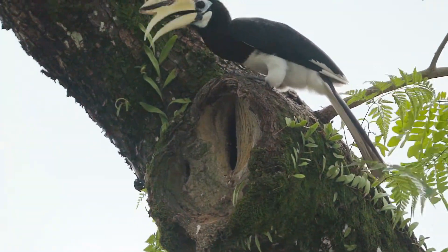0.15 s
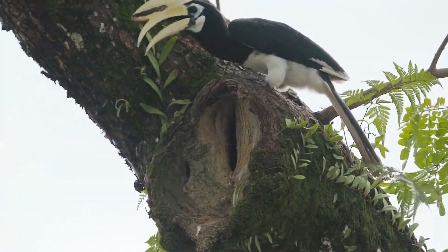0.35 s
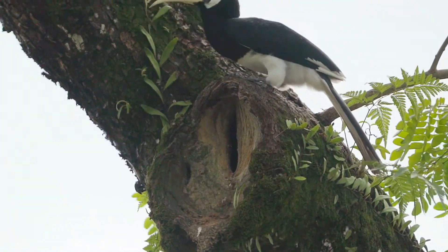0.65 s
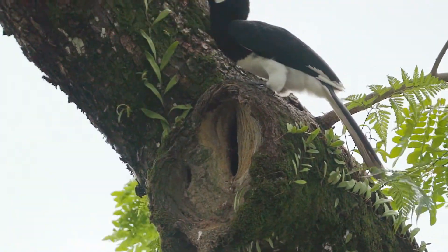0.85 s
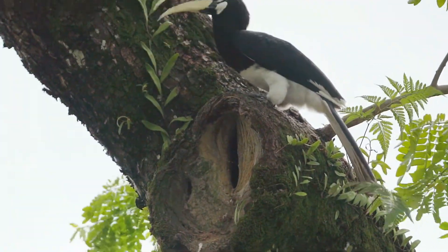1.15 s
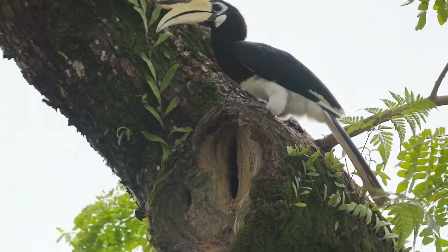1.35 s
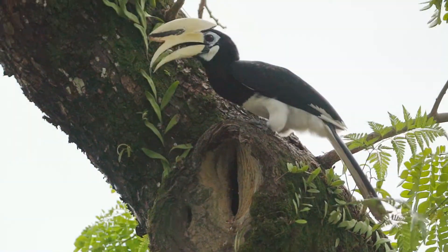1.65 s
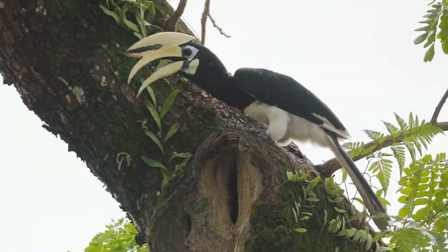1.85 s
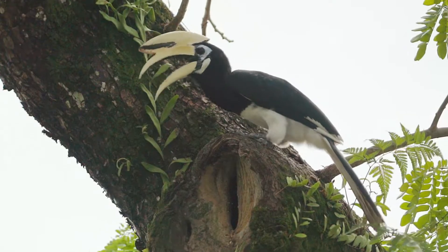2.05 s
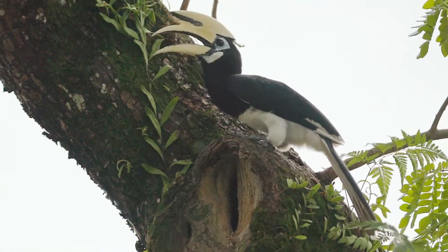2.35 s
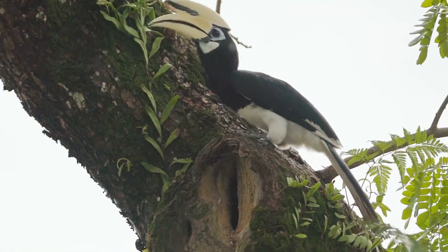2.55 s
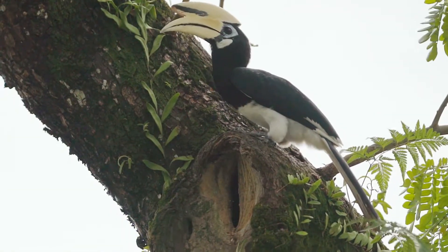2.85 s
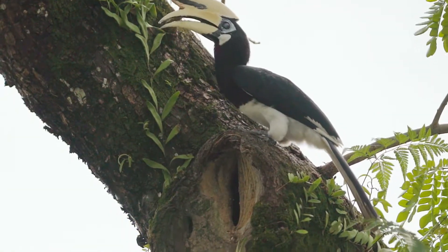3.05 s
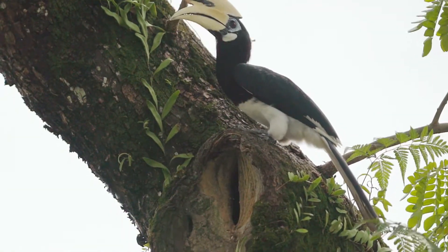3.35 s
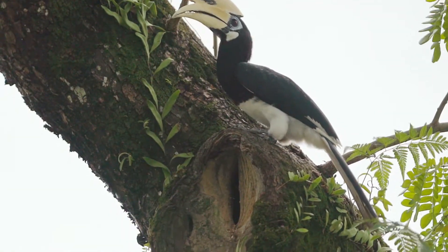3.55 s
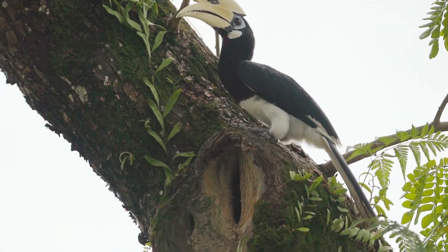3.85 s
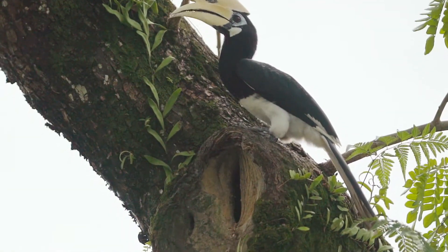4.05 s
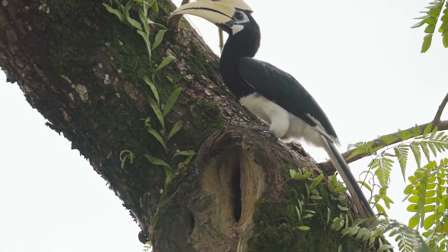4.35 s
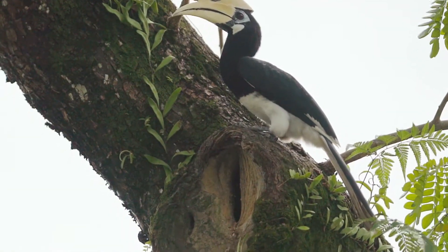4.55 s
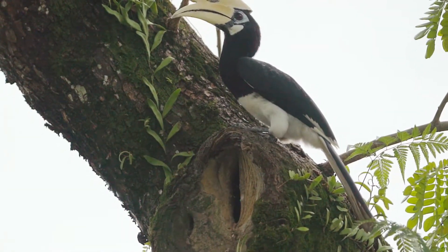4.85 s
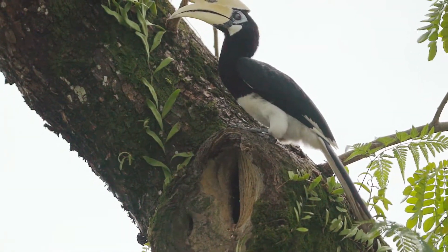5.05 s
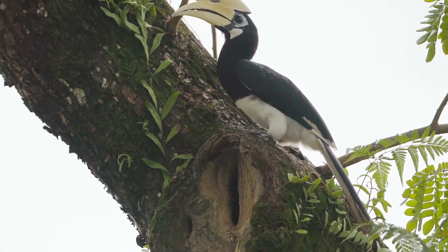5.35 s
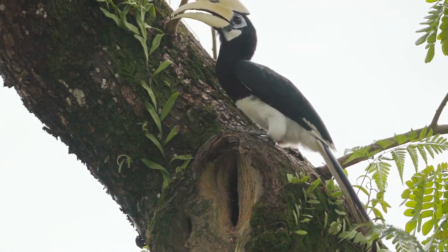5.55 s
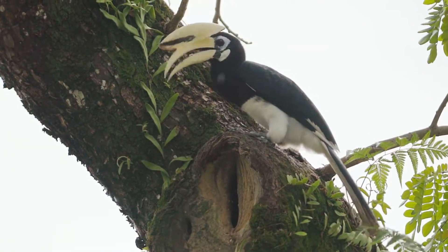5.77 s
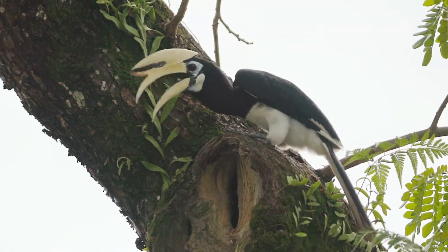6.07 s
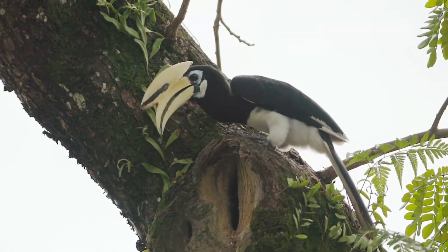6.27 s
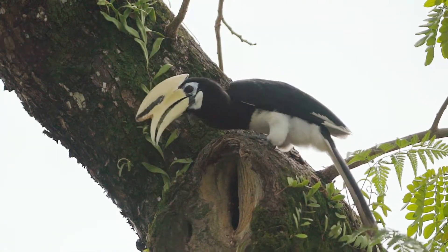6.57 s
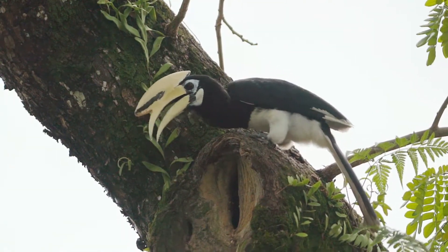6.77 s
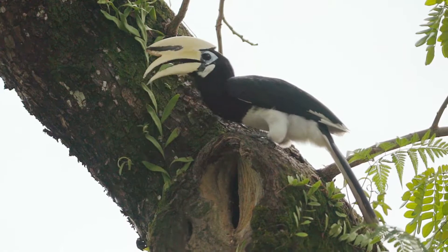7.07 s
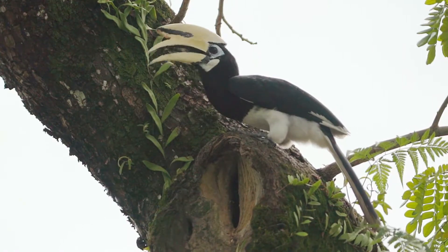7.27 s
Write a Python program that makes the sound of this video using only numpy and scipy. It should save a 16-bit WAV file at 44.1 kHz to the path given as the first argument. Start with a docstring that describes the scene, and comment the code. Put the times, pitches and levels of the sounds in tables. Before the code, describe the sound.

A hornbill calls close to the microphone in a quiet forest, with soft air, leafy hiss and thin, high insect drones. At 0.14 s comes a strong, nasal yelp that holds its pitch, then breaks downward, followed by a patter of dry bill ticks. Softer, shorter yelps follow at 0.6, an overlapping pair near 0.95, then 1.3 and 1.7, with very faint low hoots far off. Louder, brighter calls ring at 2.35 and 2.8, a sharp tick just before the second, each trailing a brief woodland echo. From 3.3 to 4.9 the opening yelps and ticks repeat exactly. Near 5.0 everything drops to a low hush, then insects and faint far birds swell back by 5.6. At 6.0 a tiny high squeak opens the loudest yelp. Soft ticks and a faint knock come at 6.5; at 6.8 all stops but the hush.

```python
"""Hornbill calling in a spliced forest scene

A hornbill on a tree trunk gives five falling yelps and two loud calls; an edit replays the opening stretch of
yelps, ticks and hoots 3.14 s later, and a last loud yelp opens with a squeak. Each yelp is a sum of harmonics
and half harmonics through a throat; the voice cracks to the octave below as notes fall. Echoes and a noise
tail are the forest throwing them back. Bands of noise make insects, far birds and ticks; gliding sines make
far hoots. All but a low hush of noise drops out near 5 s, swells back, and stops at 6.8 s."""
import sys
import numpy as np
from scipy import signal
from scipy.fft import rfft, irfft, next_fast_len
from scipy.io import wavfile

SR = 44100
rng = np.random.default_rng(int(sys.argv[2]) if len(sys.argv) > 2 else 0)


def wrap_up_sound(samples):
    """Save the sound to the file named by the first command line argument, as 16-bit audio."""
    columns = np.atleast_2d(samples).T
    # keep every value between -1 and 1, then stretch to whole-number steps
    tamed = np.clip(columns, -1, 1)
    steps = np.round(tamed * 32767).astype(np.int16)
    wavfile.write(sys.argv[1], SR, steps)


N = 326903
TIME = np.arange(N) / SR
STRETCH_END_S, REPLAY_AFTER_S = 1.85, 3.1368  # end of the opening stretch, and the delay until its replay


def amp(db):
    """Decibels to gain."""
    return 10 ** (np.asarray(db) / 20)


def unit(x):
    """Scales to rms 1."""
    return x / np.sqrt(np.mean(x ** 2) + 1e-20)


def read(points, hz, axis=1):
    """Reads one column of a spectrum table on a log-frequency axis."""
    table = np.transpose(points)
    return np.interp(np.log(hz + 1), np.log(table[0] + 1), table[axis])


def add(mix, s, sound):
    """Mixes a sound in at s seconds, cut at the end of the mix."""
    part = mix[..., round(s * SR):][..., :sound.shape[-1]]
    part += sound[..., :part.shape[-1]]


def drift(size, rate_hz):
    """Slow chance of rms 1, with nothing much faster than rate_hz."""
    hz = np.fft.rfftfreq(size, 1 / SR)
    return unit(irfft(rfft(rng.standard_normal(size)) / (1 + (hz / rate_hz) ** 4), size))


def peak(hz, centre, width):
    """Gain of a resonance, down to half at width either side of the centre."""
    return 1 / (1 + ((hz - centre) / width) ** 2)


def step(t, width_s):
    """A smooth step from 0 to 1 around t = 0."""
    return .5 + .5 * np.tanh(2 * t / width_s)


def noise(shape, size=N):
    """Stereo noise of rms 1 with the spectrum shape(hz); the ears agree in the bass."""
    # left-right likeness: (frequency [Hz], correlation [0-1])
    likeness = [(400, 0.94), (1000, 0.49), (1800, 0.33), (7000, 0.12), (13000, 0.12)]
    hz = np.fft.rfftfreq(size, 1 / SR)
    left, other = rfft(rng.standard_normal((2, size)))
    same = np.clip(read(likeness, hz), -1, 1)
    right = same * left + np.sqrt(1 - same ** 2) * other
    return unit(irfft(np.array([left, right]) * shape(hz), size))


def starts(s):
    """The opening stretch of calls, ticks and hoots is replayed by an edit 3.14 s later."""
    return [s, s + REPLAY_AFTER_S] if s < STRETCH_END_S else [s]


def hornbill():
    """Every call of the bird at its moment; the third of the five opening yelps is two overlapping calls."""
    # yelps: (start [s], hold until the voice breaks [s], fall [s], release [s], scoop [s], cracked for [s],
    # held pitch [Hz], top level [dB], top effort [0-1], upper throat ring [Hz], ring gain [dB],
    # treble sheen gain [dB])
    yelps = [(0.142, 0.083, 0.044, 0.03, .002, 0.00027, 970.5, -19, 0.84, 3770, -1.5, 7.5),
             (.572, .045, 0.0081, 0.061, 0.0049, .013, 968, -28, 0.15, 3750, -6.5, -6),
             (.939, .035, 0.014, 0.06, 0.0057, 0.011, 969, -26.5, 0.21, 3520, -3.5, -3.5),
             (.99, .038, .06, .036, .002, .048, 921, -32.5, 0.08, 3800, 5, -2.5),
             (1.278, .044, 0.0097, 0.047, 0.0047, 0.007, 979.6, -28, 0.39, 3100, 0.5, -2),
             (1.729, 0.035, .014, 0.011, .004, 0.0013, 928, -33, 0.71, 3260, -18.5, -5),
             (2.349, 0.074, 0.0075, 0.0053, 0.0018, 0.031, 961, -20, .68, 3907, 13.5, -2.5),
             (2.803, .1, .055, .042, 0.0019, 0, 982.3, -15.5, 0.96, 3794, 8.5, -3),
             (6.006, 0.02, .02, .008, 0.0017, 0.015, 1440, -35, 1, 3380, 4.5, -11.5),
             (6.017, .049, 0.016, .042, .008, 0, 1001, -14.5, 1, 3430, 15, -12)]
    voice = np.zeros(N)
    for start, *shape, ring_hz, ring_db, sheen_db in yelps:
        for s in starts(start):
            add(voice, s, yelp(gesture(*shape), ring_hz, ring_db, sheen_db))
    return voice


def gesture(hold_s, fall_s, release_s, scoop_s, cracked_s, held_hz, top_db, top_effort):
    """The course of a yelp: pitch, level, effort, slackness of the membranes and half-harmonic level."""
    scoop, arch, drop = .16, .025, .115  # shares of the held pitch
    full_fall_s = .036  # the release needed to fall all the way
    onset_db, soft_attack_s, hard_attack_s = -24, 0.0085, .004
    release_db, effort_per_db = -20, 0.05
    held_halves_db, slack_halves_db, cracked_halves_db = -41.5, -29, 4
    crack_rise_s, crack_end_s, crack_lag_s = 0.016, .007, 0.0038

    t = np.arange(0, hold_s + release_s, 1 / SR)
    since_break = t - hold_s

    # it scoops down onto its note, arches a little, then breaks and falls
    slack = step(since_break, fall_s) * min(release_s / full_fall_s, 1)  # cut short, it falls only part way
    arching = np.sin(np.pi * np.minimum(t / hold_s, 1)) - 1
    pitch = held_hz * (1 + scoop * np.exp(-t / scoop_s) + arch * arching - drop * slack)

    # it swells from below, faster at full effort, and dies away after the break; effort follows the level
    attack_s = np.interp(top_effort, [0, 1], [soft_attack_s, hard_attack_s])
    swell_db = onset_db * np.exp(-t / attack_s) + release_db * np.maximum(since_break, 0) / release_s
    effort = np.clip(top_effort + effort_per_db * swell_db, 0, 1)

    # the crack comes and goes over a few beats, and ends just after the break
    crack_depth = np.clip(cracked_s / crack_end_s, 0, 1)
    crack_in = step(since_break - crack_lag_s + cracked_s, crack_rise_s)
    crack_out = step(crack_lag_s - since_break, crack_end_s)
    cracked = crack_depth * crack_in * crack_out
    halves = amp(held_halves_db) + amp(slack_halves_db) * slack + amp(cracked_halves_db) * cracked
    return pitch, top_db + swell_db, effort, slack, 20 * np.log10(halves)


def yelp(course, ring_hz, ring_db, sheen_db, jitter=0.0015, slack_jitter=0.0079, strain_jitter=.014,
         thinning_db=-7, dulling_db=-5, dull_above_hz=4300,
         ring_width_hz=650, sheen_hz=5500, sheen_width_hz=1100,
         rasp_db=-35, slack_rasp_db=14, strain_rasp_db=4, cracked_rasp_db=7, shimmer_db=1.62):
    """One call: the syrinx's harmonics and half harmonics through a throat whose colour shifts with effort."""
    # throat and bill: (frequency [Hz], gain in a soft call [dB], gain at full effort [dB])
    throat = [(414.6, -10.5, -26), (965, 3.5, -13), (1310, -0.5, 7.5), (1902, -3.5, 3.5), (2120, -18.5, -7),
              (2930, -14, -6), (3290, -15, -14), (4060, -33.5, -24), (4570, -23, -28), (6300, -37.5, -16.5),
              (6760, -24.5, -32.5), (9300, -33.5, -43.5), (10200, -43.5, -53.5), (14850, -66, -65.5)]
    pitch, level_db, effort, slack, doubling_db = course
    size = len(pitch)
    strain = slack * effort  # slack membranes beat unevenly, most of all when driven hard
    wobble = jitter + slack_jitter * slack + strain_jitter * strain  # rms share of the pitch
    pitch = pitch * (1 + wobble * drift(size, 250))
    phase = 2 * np.pi * np.cumsum(pitch) / SR
    halves = np.arange(1, 33)[:, None]  # multiples of half the pitch
    hz = halves * pitch / 2

    def gape_db(f):
        """Two upper resonances, set by how far the bill is open."""
        ring = ring_db * np.exp(-((f - ring_hz) / ring_width_hz) ** 2)
        return ring + sheen_db * np.exp(-((f - sheen_hz) / sheen_width_hz) ** 2)

    throat_db = (1 - effort) * read(throat, hz) + effort * read(throat, hz, axis=2) + gape_db(hz)
    # high harmonics flutter most
    throat_db += shimmer_db * np.sqrt(halves / 2) * np.array([drift(size, 50) for _ in halves])
    # a strained fall thins at its fundamental and dulls at its top
    throat_db += thinning_db * strain * (halves <= 2) + dulling_db * strain * (hz > dull_above_hz)
    # strong and weak beats alternate when the voice cracks: lines between the harmonics
    gains = amp(throat_db + halves % 2 * doubling_db)
    waves = np.cos(halves * phase / 2 + rng.uniform(0, 2 * np.pi, halves.shape))
    tone = np.sqrt(2) * (gains * waves).sum(0) / np.linalg.norm(gains, axis=0)

    breath = noise(lambda f: amp(read(throat, f) + gape_db(f)) * (f / (f + 2500)) ** 2, size=size)[0]
    rasp = breath * (1 + np.cos(phase))  # a puff each beat
    hoarse_db = rasp_db + slack_rasp_db * slack + strain_rasp_db * strain
    hoarse_db = hoarse_db + cracked_rasp_db * np.minimum(amp(doubling_db), 1)
    return amp(level_db) * (tone + amp(hoarse_db) * rasp) * signal.windows.tukey(size, .05)


def short_bursts(decay_s=.0018, rise_s=0.00029, spread=1.14, trim_db=-3,
                 faint_db=-43, faint_hz=5500, count=40):
    """Dry, heavily damped noise bursts: bill and bark ticks, two soft rustles, and fainter ones at random."""
    # short noise bursts: bill and bark ticks, with two soft rustles near 1.8 and 2.0 s:
    # (time [s], level before the trim and envelope [dB], centre [Hz])
    bursts = [(.239, -25, 4260), (0.2806, -23, 4870), (.3117, -27.5, 4860), (.333, -29.5, 4500),
              (.362, -31, 4000), (.8699, -28.5, 5660), (1.042, -30.5, 3570), (1.807, -30, 2400),
              (2.002, -26, 2600), (2.717, -15, 4610), (5.37, -30.5, 2790), (5.634, -31, 4300),
              (6.508, -33, 1800), (6.529, -30.5, 2993)]
    out, t = np.zeros((2, N)), np.arange(2048) / SR
    envelope = np.exp(-t / decay_s) * (1 - np.exp(-t / rise_s))
    placed = [(start, db, hz) for s, db, hz in bursts for start in starts(s)]
    faint = [(s, faint_db, faint_hz) for s in rng.uniform(0, N / SR, count)]
    for s, db, hz in placed + faint:
        burst = noise(lambda f: peak(f, hz, spread * hz) ** 2 * f / (f + 800), size=len(t))
        add(out, s, amp(db + trim_db) * burst * envelope)
    return out


def thump(s=6.53, hz=172, db=-38, decay_s=0.007):
    """A soft low knock on the trunk: a damped sine."""
    out, t = np.zeros(N), np.arange(8192) / SR
    envelope = t / decay_s * np.exp(1 - t / decay_s)
    add(out, s, amp(db) * envelope * np.sin(2 * np.pi * hz * t))
    return out


def limb_echoes(voice, limb_hz=1100):
    """Single echoes from near limbs, which throw back the treble only."""
    # trunk, limbs and ground: (delay to the left ear [s], delay to the right ear [s],
    # level before the high-pass [dB])
    echoes = [(.0013, 0.003, -21), (.0052, 0.019, -23.5), (0.0242, 0.017, -7), (0.0371, 0.068, -17.5)]
    t = np.arange(SR) / SR
    taps = np.zeros((2, SR))
    for *delays, db in echoes:
        taps += amp(db) * np.sinc(SR * (t - np.array(delays)[:, None]))
    taps = signal.sosfilt(signal.butter(1, limb_hz, "highpass", fs=SR, output="sos"), taps)
    return signal.fftconvolve(voice[None], taps, axes=1)[:, :N]


def leaf_scatter(voice, wet_db=-18, build_s=0.013, sway=1.2, sway_hz=35):
    """The scatter of leaves and trunks: a noise tail that dies at its own rate in each band."""
    # foliage: (frequency [Hz], time to fall 60 dB [s], relative level [dB])
    foliage = [(400, 0.28, 0), (1000, .45, 0), (1820, 0.77, 1.5), (3040, 0.51, 4), (5740, 0.66, 2),
               (12000, 0.32, -15.5)]
    t = np.arange(SR) / SR
    hz, age, z = signal.stft(noise(np.ones_like, size=SR), SR, nperseg=256)
    z = z * amp(read(foliage, hz, axis=2)[:, None] - 60 * age / read(foliage, hz)[:, None])
    tail = signal.istft(z, SR, nperseg=256)[1][:, :SR] * (1 - np.exp(-t / build_s))
    far = signal.fftconvolve(voice[None], tail / np.linalg.norm(tail[0]), axes=1)[:, :N]
    # shifting paths smear each harmonic: phase drifts by sway [radians rms]
    blur = np.exp(1j * sway * np.array([drift(N, sway_hz) for _ in far]))
    return amp(wet_db) * (signal.hilbert(far, next_fast_len(N))[:, :N] * blur).real


def far_hoots(arch=.11):
    """Soft far hoots: sines whose pitch and level arch together."""
    # far hoots: (start [s], length [s], top pitch [Hz], level [dB])
    hoots = [(0.028, 0.26, 288, -54.5), (0.444, 0.25, 292, -57), (0.816, 0.33, 294, -52.5),
             (2.585, 0.2, 513, -44)]
    out = np.zeros((2, N))
    for s, length, hz, db in hoots:
        swell = np.sin(np.linspace(0, np.pi, round(length * SR)))
        for start in starts(s):
            pitch = hz * (1 + arch * (swell - 1) + 0.0087 * drift(len(swell), 30))
            hoot = np.sqrt(2) * swell * np.sin(2 * np.pi * np.cumsum(pitch) / SR)
            add(out, start, amp(db) * hoot)
    return out


def narrow_bands():
    """Narrow bands of noise that fade in and out: far birds, insect swells and the fading echo of a call."""
    # far birds, insect swells and a call's echo: (start [s], length [s], centre [Hz], width [Hz], level [dB])
    bands = [(1.863, 0.13, 2002, 60, -48.5), (2.16, .16, 1720, 250, -47), (2.561, 0.1, 3700, 900, -47.5),
             (5.147, 0.29, 2820, 40, -55), (5.364, 0.37, 3514, 60, -55.5), (5.419, 0.33, 2780, 450, -54),
             (5.519, 0.52, 4700, 100, -60), (5.663, .14, 4220, 400, -47.5), (5.703, .1, 5420, 250, -52.5),
             (5.718, .26, 5270, 90, -60.5), (5.654, 0.31, 2503, 120, -55), (5.708, 0.22, 1733, 342, -43),
             (6.454, 0.17, 1790, 354, -47), (6.414, 0.39, 4755, 89.5, -56), (6.55, 0.34, 2032, 30, -53)]
    out = np.zeros((2, N))
    for s, length, hz, width, db in bands:
        size = round(length * SR)
        band = noise(lambda f: peak(f, hz, width / 2), size=size)
        add(out, s, amp(db) * band * signal.windows.tukey(size, .6))
    return out


def chorus(hz, width_hz, db):
    """Many insects on one pitch: a narrow band that wavers."""
    waver_db = .8 * drift(N, 5)
    return noise(lambda f: peak(f, hz, width_hz) ** 2) * amp(db + waver_db)


def insects(swell_s=0.78, cut_s=0.034, low_db=-64.5, high_db=-55.5):
    """Three drones; the highest swells, and is cut short where the sound is spliced."""
    # swells of the highest drone, each up to a splice: (start [s], end [s])
    swells = [(.2, 2.1), (3.35, 5.6), (6.15, 6.85)]
    swell = sum(np.clip(np.minimum((TIME - start) / swell_s, (end - TIME) / cut_s), 0, 1)
                for start, end in swells)
    drones = chorus(hz=1692, width_hz=300, db=-51.0) + chorus(hz=6878, width_hz=390, db=-51.0)
    return drones + chorus(hz=7630, width_hz=580, db=low_db + (high_db - low_db) * swell)


def air_and_rustle(air_db=-53, rustle_above_hz=1200, jump_s=.03, fade_s=1.0, base_db=0.7):
    """Steady low air, and above it rustling noise that jumps up where the sound is spliced, then fades."""
    # forest air: (frequency [Hz], relative level per Hz [dB])
    air_colour = [(25, -17.5), (60, -7.5), (130, -3.5), (280, 1), (480, -4), (800, -6), (1300, -8.5),
                  (2400, -10), (4000, -12.5), (6000, -16.5), (9000, -25), (12000, -30), (16000, -31.5)]
    # surges of the rustle: (time [s], lift [dB])
    surges = [(-.05, 8), (1.94, 9.5), (3.08, 4.5), (5.58, 4)]
    rustle_db = base_db
    for s, lift_db in surges:
        jump = np.clip((TIME - s) / jump_s, 0, 1)
        rustle_db = rustle_db + lift_db * jump * np.exp(-abs(TIME - s) / fade_s)
    air = amp(air_db) * noise(lambda f: amp(read(air_colour, f)))
    low = signal.sosfiltfilt(signal.butter(1, rustle_above_hz, fs=SR, output="sos"), air)
    return low + (air - low) * amp(rustle_db + 0.3 * drift(N, 60))


def low_hush(hush_db=-66.5):
    """A low bed of noise, steady but for a slight waver."""
    # low hush: (frequency [Hz], relative level per Hz [dB])
    hush_colour = [(25, -18), (120, 0.5), (280, -12), (700, -19.5), (1600, -23.5), (3500, -36.5),
                   (9000, -47), (15000, -58)]
    return noise(lambda f: amp(read(hush_colour, f))) * amp(hush_db + 0.82 * drift(N, 6.8))


def scene(left_db=0.97):
    """The bird close by in a forest that drops out, swells back and stops over the hush."""
    # gain of everything but the hush: (time [s], gain [linear])
    fade = [(4.972, 0.88), (4.984, 0.015), (5.04, 0), (5.2, 0.1), (5.4, 0.49), (5.6, 1), (6.796, 0.87),
            (6.806, 0)]
    voice = hornbill()
    # the left port hears it louder and one sample later
    direct = np.array([np.roll(voice, 1), voice]) * amp([[.7], [-1.2]])
    bird = direct + limb_echoes(voice) + leaf_scatter(voice) + short_bursts() + thump()
    haze = (air_and_rustle() + insects()) * amp([[left_db], [-left_db]])  # a little to the left
    near = bird + far_hoots() + narrow_bands() + haze
    return near * np.interp(TIME, *np.transpose(fade)) + low_hush()


def record(dry, lopsided=0.63, edge_hz=15850):
    """The microphone rectifies loud calls a little, leaving a faint low push; then the band limit."""
    push_band = signal.butter(2, [4, 22], "bandpass", fs=SR, output="sos")
    push = signal.sosfilt(push_band, (dry ** 2).mean(0))
    band_limit = signal.firwin(511, edge_hz, window=("kaiser", 9), fs=SR)
    return signal.oaconvolve(dry + lopsided * push, band_limit[None], "same", axes=1)


dry = scene()
out = record(dry)
wrap_up_sound(out)
```